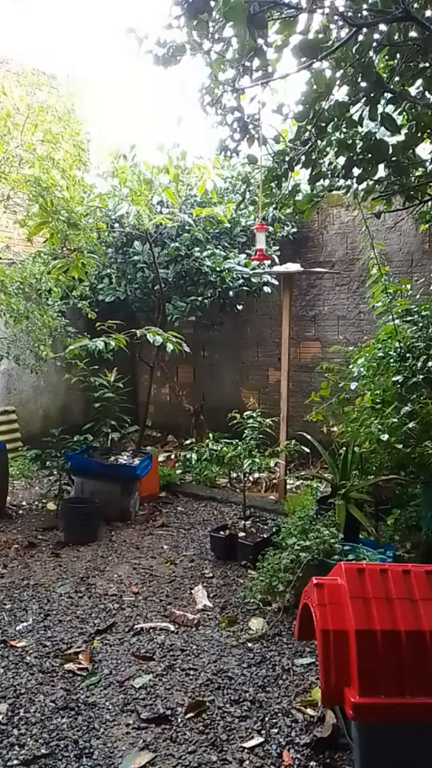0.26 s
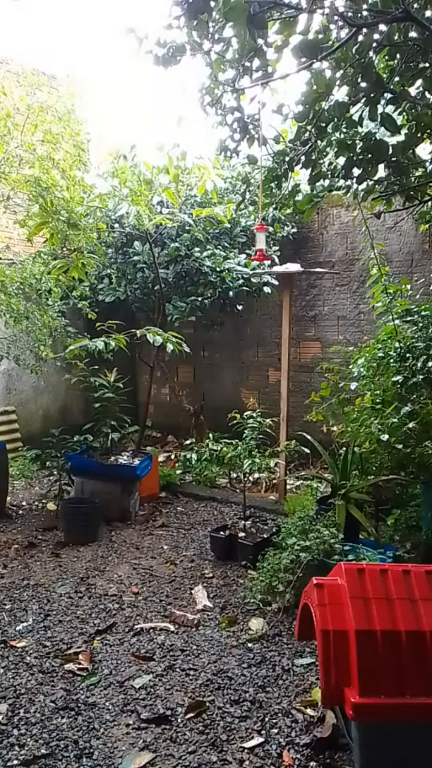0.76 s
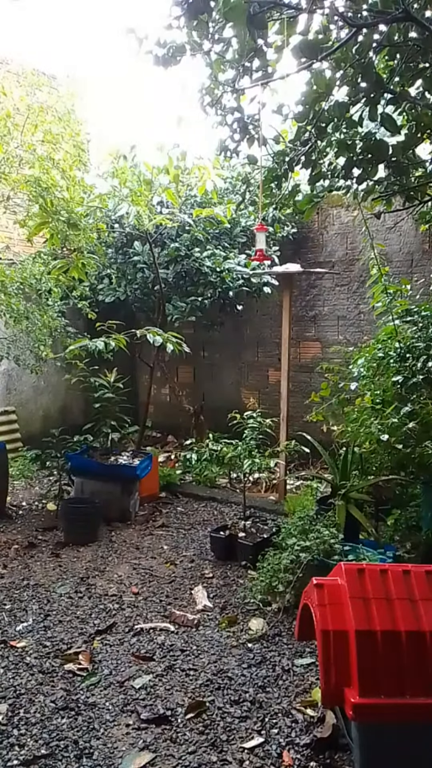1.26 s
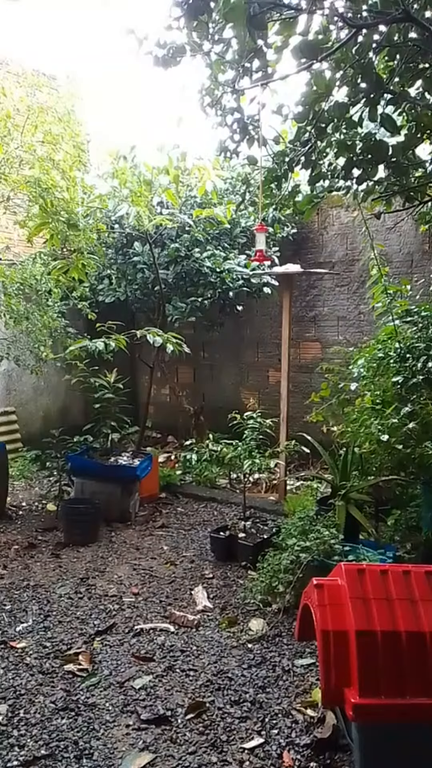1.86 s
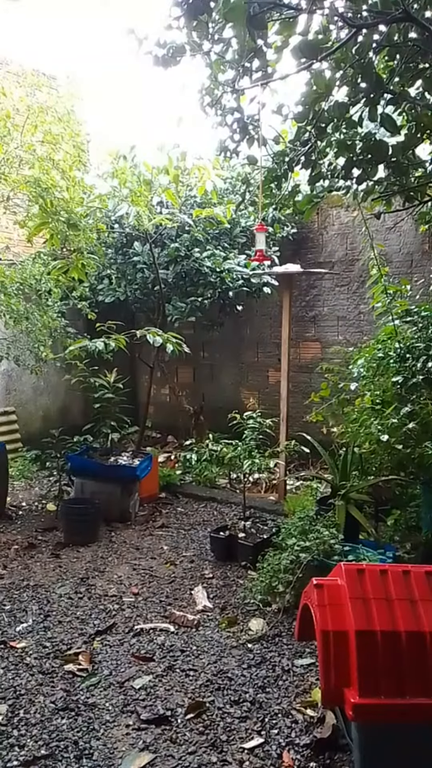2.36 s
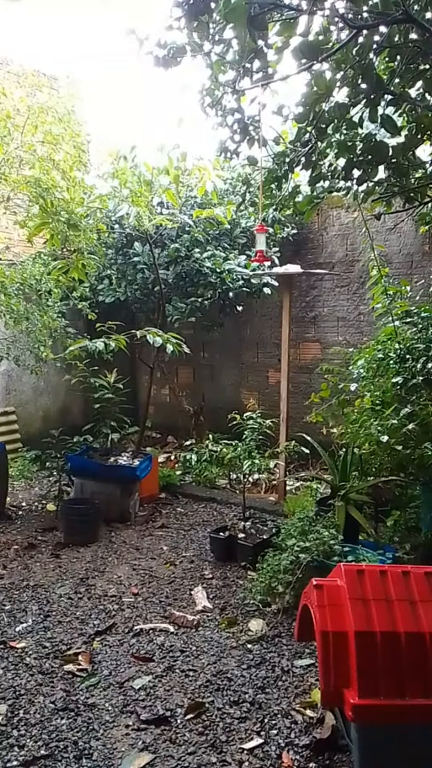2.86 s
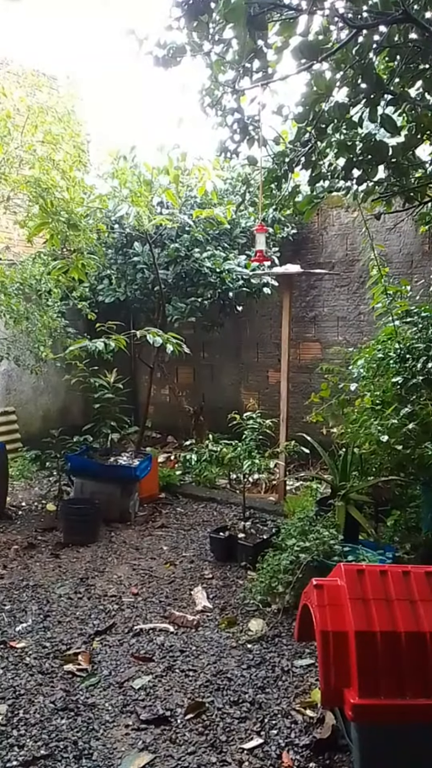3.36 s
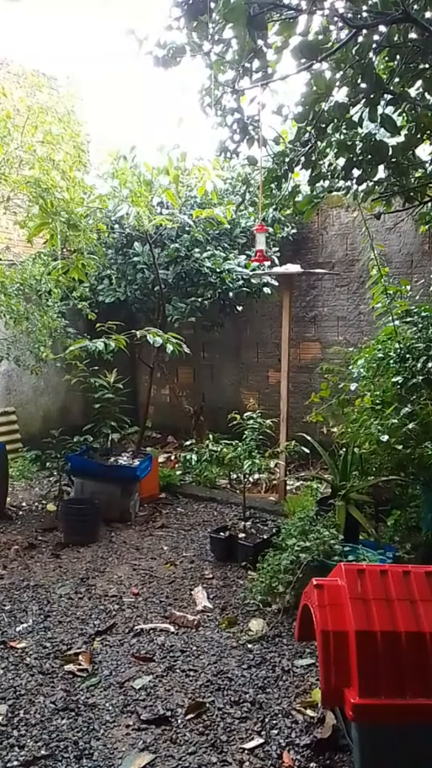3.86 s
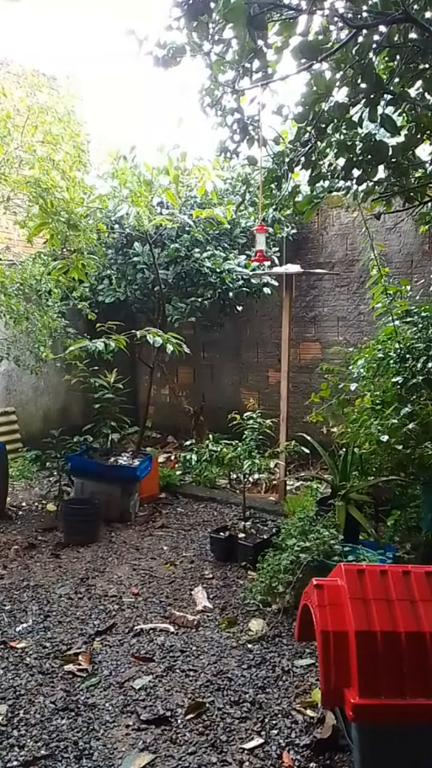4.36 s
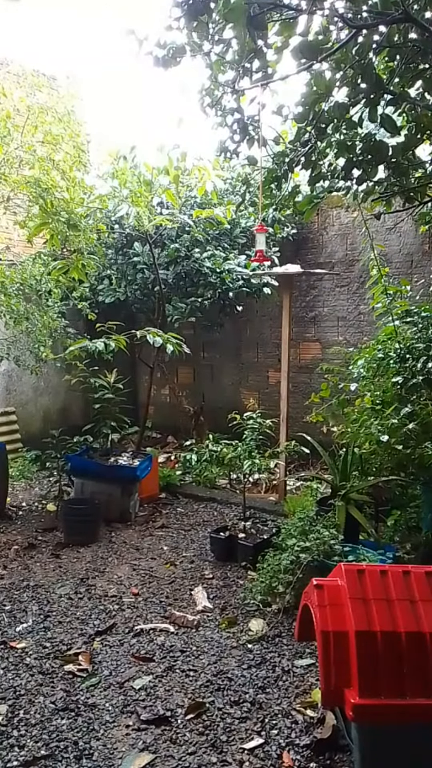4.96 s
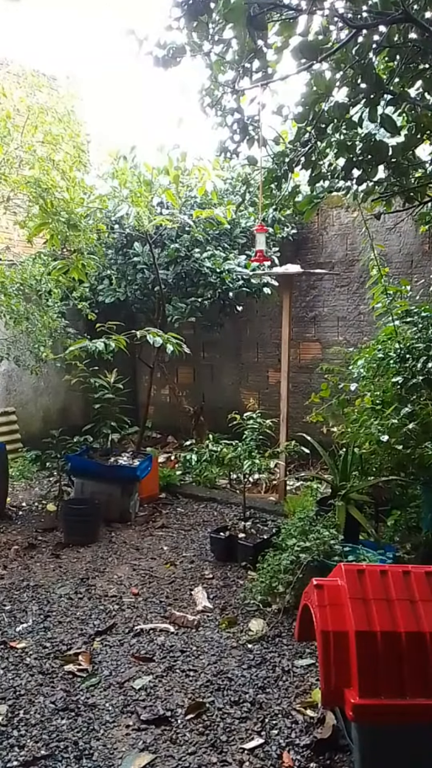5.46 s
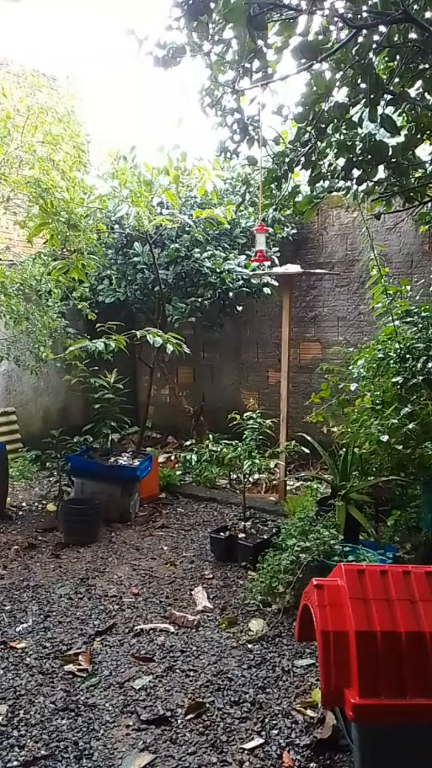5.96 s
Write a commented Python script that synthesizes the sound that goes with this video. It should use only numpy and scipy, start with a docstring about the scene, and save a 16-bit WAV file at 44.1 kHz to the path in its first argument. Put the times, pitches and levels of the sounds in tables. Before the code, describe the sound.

Drizzle patters on foliage and stones, bright nearby drops ticking and splashing, occasional low plastic knocks, over a soft steady outdoor murmur.

```python
"""A small walled garden in light rain, heard through a microphone that rings between 8 and 9 kHz.
Near drops tick and splash on leaves and gravel: short noise bursts, each with a noise tail for the walls.
Fat drips thud on hollow plastic (a low sine and noise through its resonances); narrow bands of noise make
short ringing notes, some from struck drops, and faint thin whines.
Behind lie a fine patter of drizzle, made of many tiny tuned noise pats, and a steady outdoor murmur."""
import sys
import numpy as np
from scipy import signal
from scipy.fft import rfft, irfft
from scipy.io import wavfile

SR = 44100
rng = np.random.default_rng(int(sys.argv[2]) if len(sys.argv) > 2 else 0)


def master_out(mix):
    """Clip the mix to full scale and print it as 16-bit PCM to the path in sys.argv[1]."""
    frames = np.transpose(np.atleast_2d(mix))
    ceiling = np.clip(frames, -1, 1)
    pcm = np.round(ceiling * 32767).astype(np.int16)
    wavfile.write(sys.argv[1], SR, pcm)


N = 273861   # length of the scene in samples

# Every single hit, and every filter, is HIT_SIZE samples long.
HIT_SIZE = 16384
AGE = np.arange(HIT_SIZE) / SR   # seconds since the hit began
HIT_HZ = np.maximum(np.arange(HIT_SIZE // 2 + 1) * SR / HIT_SIZE, 1)   # frequencies at which filters are drawn

# How the drizzle swells and fades. Each row: time in seconds, level in dB before the offset of each layer.
DRIZZLE_LEVEL = [(0, -43), (.7, -43.5), (.85, -70), (1, -44.5), (1.15, -44.5), (1.4, -45.5), (2.45, -41.5),
                 (2.7, -57), (3.1, -63), (3.35, -50.5), (3.7, -56), (4.1, -41.5), (4.8, -43), (5.45, -40.5),
                 (5.65, -60.5), (6.2, -48)]
# What a drop lands on. Each name gives: rise of the splash in seconds, low edge of its sound in Hz.
SURFACES = {"gravel": (0.0038, 6750), "leaf": (0.0025, 3400), "broad leaf": (0.002, 390),
            "bush": (0.0078, 440)}


def from_db(db):
    """Turn decibels into a gain."""
    return 10 ** (np.asarray(db) / 20)


def rms_one(x):
    """Scale to an average strength (rms) of 1."""
    return x / np.sqrt(np.mean(x ** 2) + 1e-20)


def add(out, s, sound):
    """Mix a sound in at time s, in seconds."""
    at = int(np.clip(s * SR, 0, N - 1))
    out[at:at + len(sound)] += sound[:N - at]


def shaped(x, gain):
    """Filter x with the given gain at HIT_HZ, reacting as early as possible (minimum phase)."""
    # Folding the cepstrum, the spectrum of the log gain, puts all of the response after the hit.
    cepstrum = irfft(np.log(gain + 1e-6))
    cepstrum[1:HIT_SIZE // 2] *= 2
    cepstrum[HIT_SIZE // 2 + 1:] = 0
    response = irfft(np.exp(rfft(cepstrum)))
    return signal.fftconvolve(x, response)[:len(x)]


def colour(points):
    """Draw a smooth gain curve through the (Hz, dB) rows of a table."""
    hz, db = np.transpose(points)
    return from_db(np.interp(np.log(HIT_HZ), np.log(hz), db))


def edge(ratio, order):
    """Butterworth slope: the gain falls where the frequency ratio passes 1."""
    return 1 / np.sqrt(1 + ratio ** (2 * order))


def resonance(hz, db, octaves):
    """Gain of one resonant hump, whose dB are halved at this many octaves from its centre."""
    return from_db(db / (1 + (np.log2(HIT_HZ / hz) / octaves) ** 2))


def droplets(per_s, spread_db, size):
    """Droplets arrive at random as clicks of uneven strength; rms 1."""
    born = rng.random(size) < per_s / SR
    strength = from_db(spread_db * np.minimum(rng.exponential(1, size), 4))
    sign = rng.choice([-1, 1], size)
    return rms_one(born * strength * sign)


def splash(rise_s, spray_s, spray_db, tail_db, per_s, t60):
    """A brief spray of droplets, with the smooth tail thrown back by walls and foliage."""
    spray = droplets(per_s, 1.14, HIT_SIZE) * from_db(spray_db) * np.exp(-AGE / spray_s)
    tail = rng.standard_normal(HIT_SIZE) * from_db(tail_db - 60 * AGE / t60)   # falls 60 dB in t60 seconds
    rise = np.sqrt(1 - np.exp(-AGE / max(rise_s, 1e-4)))
    return rise * (spray + tail)


def leaf_drops(tick_s=0.00034, tick_gain_db=14.4, softening=0.042, spray_length=2.77, swell_s=0.0029, level_db=.5):
    """Each drop lands with a tick and bursts; the leaf or stone that it meets sets the colour."""
    # The nearer drops. Each row: start in seconds, splash level in dB before level_db and the filters,
    # tick level in dB before tick_gain_db, ring in Hz, ring strength in dB, surface.
    near_drops = [(.002, -46, 9.5, 8000, 1, "gravel"), (.105, -54.5, 6, 6000, 7, "bush"),
                  (.127, -49, 19, 7200, 6.5, "gravel"), (.246, -51.5, 14, 5600, 3, "leaf"),
                  (.297, -49.5, 2, 1300, 6, "broad leaf"), (.36, -52.5, 8, 5900, 4, "broad leaf"),
                  (.512, -50, 22.5, 7650, 7, "gravel"), (.553, -45.5, 4, 6050, 11, "leaf"),
                  (.647, -52.5, 7, 4400, 12.5, "leaf"), (.688, -49, 0, 5000, -1, "gravel"),
                  (.775, -53.5, 18, 4740, 13.5, "leaf"), (.821, -45, 0, 5370, 8, "gravel"),
                  (.96, -43.5, 6, 1900, 19, "leaf"), (.98, -47.5, 14.5, 3800, 13, "gravel"),
                  (1.162, -50.5, 19, 9860, 15, "gravel"), (1.287, -51, 9, 6940, 8.5, "broad leaf"),
                  (1.394, -66, 10.5, 7140, 23, "bush"), (1.423, -51, 0, 5400, 8, "broad leaf"),
                  (1.433, -51.5, 13.5, 5330, 15.5, "leaf"), (1.462, -51, 10, 4100, 13, "gravel"),
                  (1.527, -46, 17.5, 2400, 8.5, "broad leaf"),
                  (1.592, -53.5, 13.5, 2200, 15.5, "broad leaf"),
                  (1.628, -47.5, 12, 1270, 12.5, "broad leaf"), (1.676, -49, 10, 7700, 1, "bush"),
                  (1.748, -47.5, 1, 8200, 1, "broad leaf"), (1.791, -52, 17.5, 6050, 13, "leaf"),
                  (1.938, -49, 9, 7400, 5.5, "broad leaf"), (1.986, -51, 9, 5300, 11, "leaf"),
                  (2.111, -53, 15, 4600, 15.5, "gravel"), (2.174, -45.5, 9.5, 7400, 2, "leaf"),
                  (2.216, -55, 15, 6800, 10, "broad leaf"), (2.358, -50, 6, 4830, 13, "bush"),
                  (2.41, -55, 21, 1300, 2, "bush"), (2.537, -49.5, 2, 4400, 16, "leaf"),
                  (2.854, -63, 0, 8300, 10, "bush"), (2.9, -54.5, 9, 7750, 10, "gravel"),
                  (3.017, -72.5, 14, 8100, 17, "gravel"), (3.03, -65, 3, 3200, 8, "broad leaf"),
                  (3.146, -66, 7.5, 8100, 11, "gravel"), (3.218, -50, 3, 9500, 5, "gravel"),
                  (3.24, -49, 2, 7800, 4, "gravel"), (3.283, -54.5, 14, 9000, 2, "gravel"),
                  (3.357, -48, 11, 5000, 4, "gravel"), (3.411, -45.5, 7.5, 8000, 0.5, "leaf"),
                  (3.44, -50.5, 7, 4500, 6, "leaf"), (3.514, -63, 6, 3000, 16, "broad leaf"),
                  (3.55, -46.5, 8.5, 8000, 0.5, "gravel"), (3.591, -45, 0, 7200, 4.5, "gravel"),
                  (3.633, -44, 6.5, 6600, 4, "gravel"), (3.698, -43.5, 10, 4500, 10.5, "gravel"),
                  (3.727, -44, -5, 4760, 4, "leaf"), (3.799, -45, 15.5, 4200, 9.5, "gravel"),
                  (3.904, -47, 5, 4300, 10, "leaf"), (3.933, -45.5, 7, 2520, 12.5, "leaf"),
                  (4.014, -48, 9, 9000, 1.5, "broad leaf"), (4.072, -42, 16.5, 4100, 2, "gravel"),
                  (4.119, -43, 13, 3130, 10, "broad leaf"), (4.131, -46, 18, 4550, 9, "broad leaf"),
                  (4.216, -51, 20, 3080, 14, "broad leaf"), (4.27, -43.5, 6.5, 1500, 3, "broad leaf"),
                  (4.282, -51, 17, 1840, 11, "broad leaf"), (4.398, -47, 10, 8160, 8.5, "gravel"),
                  (4.418, -43.5, 11, 5540, 7.5, "leaf"), (4.529, -47.5, 13.5, 3680, 6.5, "leaf"),
                  (4.676, -50, 11, 1980, 15, "broad leaf"), (4.75, -46, 7.5, 10600, 9, "leaf"),
                  (4.81, -53.5, 0, 8000, 3, "bush"), (4.856, -49.5, 10.5, 10600, 6.5, "leaf"),
                  (4.958, -50, 9.5, 2200, 3.5, "broad leaf"), (5.136, -45, 2.5, 10500, 6, "bush"),
                  (5.215, -47, 8, 9800, 3, "broad leaf"), (5.245, -48.5, 20.5, 7700, 2, "leaf"),
                  (5.284, -47, 7, 7500, 5, "gravel"), (5.39, -52, -3, 1300, 9, "bush"),
                  (5.642, -58, 11, 7240, 10, "leaf"), (5.777, -52.5, 11.5, 7800, 10.5, "gravel"),
                  (5.857, -53, 23, 8600, 11.5, "gravel"), (5.884, -53, 14, 3880, 12, "gravel"),
                  (6.017, -51, 14, 5000, 4, "gravel"), (6.086, -55.5, 5, 6500, 10, "gravel"),
                  (6.132, -62, 4, 9660, 12, "leaf")]
    # Upper limit of the treble in this layer, lower from about 2.5 s on.
    # Each row: time in seconds, limit in Hz.
    treble_limit = [(0, 15000), (2.2, 15000), (2.55, 11400), (3.4, 13000), (3.6, 10200), (5.4, 10700),
                    (6.2, 9800)]
    spray_base_db = 2.0
    spray_follows = 0.58   # the spray grows by this share of the tick, as both mark a near drop
    out = np.zeros(N)
    for s, db, tick_db, ring_hz, ring_db, surface in near_drops + small_drops():
        rise_s, low_hz = SURFACES[surface]
        high_hz = np.interp(s, *np.transpose(treble_limit))

        contact_s = tick_s + softening * rise_s   # a yielding leaf spreads both tick and splash
        tick = rng.standard_normal(HIT_SIZE) * AGE * np.exp(-AGE / contact_s)
        tick *= from_db(tick_db + tick_gain_db) / np.linalg.norm(tick)

        # A gentle drop flattens longer before it bursts.
        swell = 1 - np.exp(-AGE / (swell_s * from_db(-spray_follows * tick_db)))
        spray_db = spray_base_db + spray_follows * tick_db
        spray_s = spray_length * rise_s
        burst = tick + swell * splash(rise_s, spray_s, spray_db, tail_db=0.0, per_s=2600, t60=0.37)

        leaf = edge(low_hz / HIT_HZ, order=2) * edge(HIT_HZ / high_hz, order=4)
        leaf = leaf * resonance(ring_hz, ring_db, octaves=0.2) * ripple(depth_db=3.0, width_hz=240)
        add(out, s, from_db(db + level_db) * shaped(burst, leaf))
    return out


def small_drops(per_s=14, offset_db=-17.5, spread_db=4.5, tick_db=11.5, ring_db=8):
    """Stray drops at random times, on any surface and pitch, whose strength follows that of the drizzle."""
    rows = []
    names = list(SURFACES)
    for when, size, pitch, place in rng.random((int(per_s * N / SR), 4)):
        s = when * N / SR
        db = np.interp(s, *np.transpose(DRIZZLE_LEVEL)) + offset_db + spread_db * (2 * size - 1)
        ring_hz = 1500 * 2 ** (2.5 * pitch)
        surface = names[int(place * len(names))]
        rows.append((s, db, tick_db, ring_hz, ring_db, surface))
    return rows


def ripple(depth_db, width_hz):
    """Every leaf and stone has peaks and dips of its own: a random gain curve."""
    knots = np.arange(0, SR / 2, width_hz)
    heights_db = depth_db * rng.standard_normal(HIT_SIZE)[:len(knots)]
    return rms_one(from_db(np.interp(HIT_HZ, knots, heights_db)))


def hollow_drips(soft_hz=3000, boom_db=-22.0, boom_t60=0.1):
    """A fat drip drums on a thin wall that booms low and briefly."""
    # Fat drips. Each row: start in seconds, level in dB before the filters, ring in Hz, spot.
    fat_drips = [(.002, -33.5, 424, "knock"), (.055, -42, 594, "far"), (.314, -35, 295, "boom"),
                 (.953, -42, 435, "far"), (1.061, -36.5, 330, "slap"), (1.281, -26, 295, "knock"),
                 (1.422, -32, 950, "knock"), (1.75, -33.5, 314, "boom"), (2.231, -24, 313, "knock"),
                 (2.384, -32.5, 394, "knock"), (2.811, -30.5, 322, "far"), (3.196, -33, 333, "boom"),
                 (3.691, -38, 300, "far"), (3.902, -48, 318, "slap"), (4.005, -27.5, 417, "knock"),
                 (4.389, -25.5, 326, "knock"), (4.711, -33, 330, "boom"), (5.009, -30, 231, "far"),
                 (5.085, -39, 364, "slap"), (5.297, -36, 320, "slap"), (5.584, -36.5, 350, "boom"),
                 (6.01, -33.5, 341, "knock")]
    # Spots where drips keep falling on hollow plastic. Each name gives: rise in seconds, low edge in Hz,
    # tilt in dB per octave, ring strength in dB.
    drip_spots = {"boom": (.006, 180, -7.5, 10.5), "knock": (.008, 550, -10.8, 10),
                  "slap": (.012, 200, -2, 10), "far": (0.18, 618, -6.5, 18.5)}
    # Resonances of the hollow plastic. Each row: centre in Hz, half width in octaves, strength in dB.
    hollow_modes = [(217, .06, 4), (263, 0.027, 3.5), (341.5, 0.055, 4), (440, .05, 2), (593, 0.014, 6.5)]
    out = np.zeros(N)
    wall = edge(145 / HIT_HZ, order=6)
    for hz, octaves, db in hollow_modes:
        wall = wall * resonance(hz, db, octaves)
    for s, db, ring_hz, spot in fat_drips:
        rise_s, low_hz, tilt_db, ring_db = drip_spots[spot]
        boom = np.sin(2 * np.pi * ring_hz * AGE) * from_db(boom_db - 60 * AGE / boom_t60)
        burst = boom + splash(rise_s, spray_s=0.019, spray_db=5.0, tail_db=-0.5, per_s=2500, t60=0.36)
        slope = from_db(tilt_db * np.log2(HIT_HZ / 400))
        body = edge(low_hz / HIT_HZ, order=3) * edge(HIT_HZ / soft_hz, order=2)
        body = body * resonance(ring_hz, ring_db, octaves=0.32)
        add(out, s, from_db(db) * shaped(burst, slope * body * wall))
    return out


def plinks(rise_s=0.0017, width_hz=270):
    """Each note or whine is a narrow, wavering band of noise that starts fast and dies away."""
    # Short ringing notes, some from struck drops, and faint thin whines near 3.1 and 3.9 kHz.
    # Each row: start in seconds, level in dB, pitch in Hz, time to fall by 60 dB in seconds.
    ringing_notes = [(0.648, -53, 4500, .13), (1.545, -47, 2300, .2), (1.94, -53, 3480, 0.25),
                     (2.38, -47, 1270, 0.1), (2.69, -67, 1320, .13), (2.85, -59, 745, 0.35),
                     (3.115, -79.5, 3120, 2.2), (3.52, -58.5, 2370, .27), (4.222, -46, 3400, .16),
                     (5.47, -65, 3900, 0.84), (5.644, -61, 3900, .34), (5.718, -66, 1250, 0.38),
                     (5.785, -58, 3800, 0.29), (5.9, -60, 3900, 0.15), (6.02, -65, 3920, 0.77),
                     (6.171, -61, 1230, 0.15)]
    out = np.zeros(N)
    for s, db, hz, t60 in ringing_notes:
        band = signal.butter(2, [hz - width_hz / 2, hz + width_hz / 2], "band", fs=SR, output="sos")
        note = rms_one(signal.sosfilt(band, rng.standard_normal(HIT_SIZE)))
        fade = from_db(db - 60 * AGE / t60)
        rise = 1 - np.exp(-AGE / rise_s)
        add(out, s, note * fade * rise)
    return out


def drizzle(level_db=-10, per_s=28, spread_db=3.5, leaf_q=7, fade_s=0.017, count=24):
    """Countless small drops all over the garden, dealt to leaves of many pitches and blurred by distance."""
    # Colour of the drizzle. Each row: frequency in Hz, gain in dB.
    patter_colour = [(300, 4), (700, 1), (1500, -7), (3000, -9.5), (5000, -8), (8000, -10), (11000, -11),
                     (13000, -14), (16000, -11)]
    patter = np.zeros(N)
    for hz in np.geomspace(450, 14000, count):
        b, a = signal.iirpeak(hz, leaf_q, fs=SR)
        pat = signal.lfilter(b, a, rng.standard_normal(HIT_SIZE) * np.exp(-AGE / fade_s))
        patter += signal.fftconvolve(droplets(per_s, spread_db, N), pat)[:N]
    s, db = np.transpose(DRIZZLE_LEVEL)
    level = from_db(level_db + np.interp(np.arange(N) / SR, s, db))
    return level * shaped(rms_one(patter), colour(patter_colour))


def murmur():
    """Steady far-off rumble with a faint hiss: white noise through one fixed colour."""
    # Colour of the outdoors. Each row: frequency in Hz, gain in dB applied to white noise of rms 1.
    outdoor_colour = [(25, -75), (55, -64), (105, -56.5), (160, -48.5), (220, -43), (400, -49), (600, -57),
                      (1000, -72), (2000, -87), (3300, -86), (7000, -83), (9000, -74), (16000, -90)]
    noise = rng.standard_normal(N + HIT_SIZE)
    return shaped(noise, colour(outdoor_colour))[HIT_SIZE:]   # skip the start, where the filter fills up


def scene():
    """Near drops, drips and ringing notes over the drizzle and the murmur."""
    near = leaf_drops() + hollow_drips() + plinks()
    return (near + drizzle() + murmur())[None]


def record(dry):
    """The microphone port rings in the treble; a steep low-pass cuts the top."""
    # Resonance of the microphone port. Each row: frequency in Hz, gain in dB.
    port_ring = [(5000, -1), (7000, 0.5), (7800, 4.5), (8400, 13), (9000, 12), (10000, 8), (11000, 4.5),
                 (12200, 0), (15600, -1)]
    coloured = shaped(dry[0], colour(port_ring))
    low_pass = signal.ellip(10, .2, 70, 15900, fs=SR, output="sos")   # cutoff in Hz
    return signal.sosfilt(low_pass, coloured)[None]


dry = scene()
out = record(dry)
master_out(out)
```